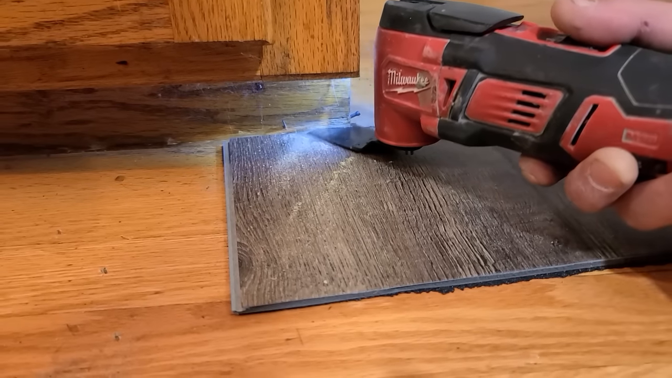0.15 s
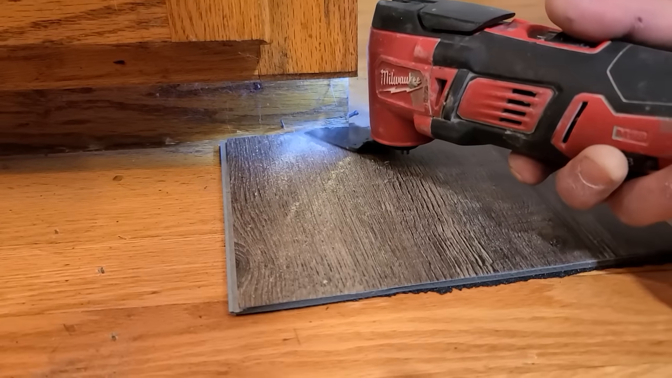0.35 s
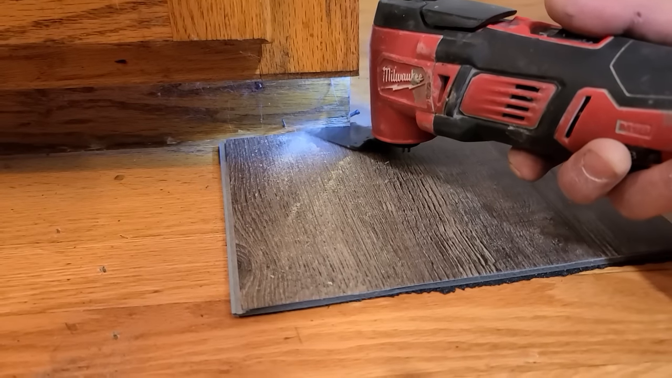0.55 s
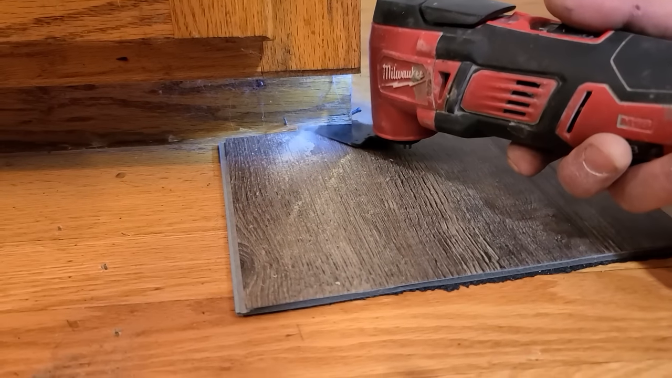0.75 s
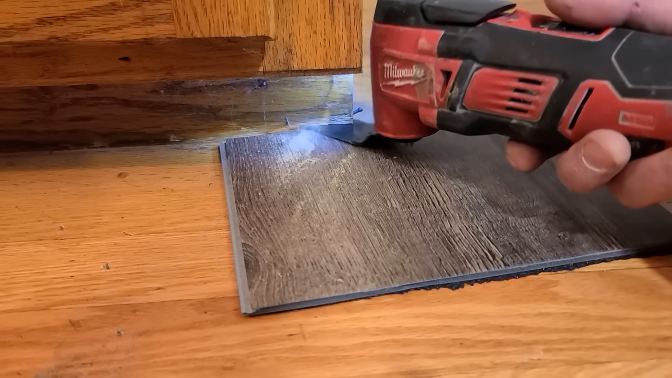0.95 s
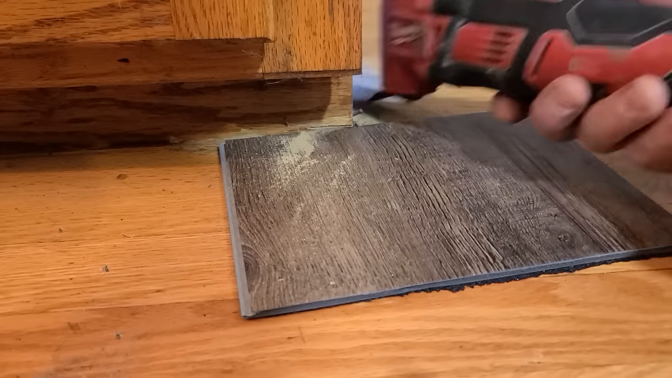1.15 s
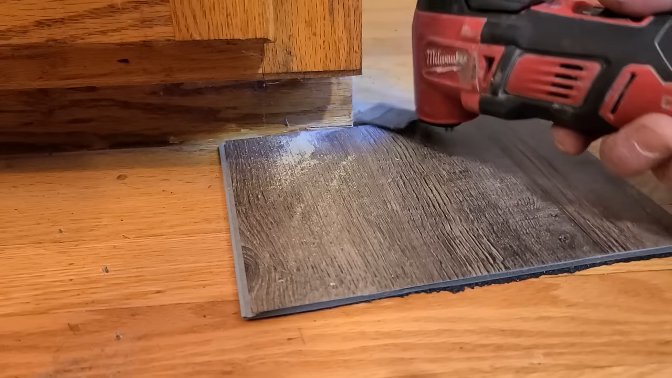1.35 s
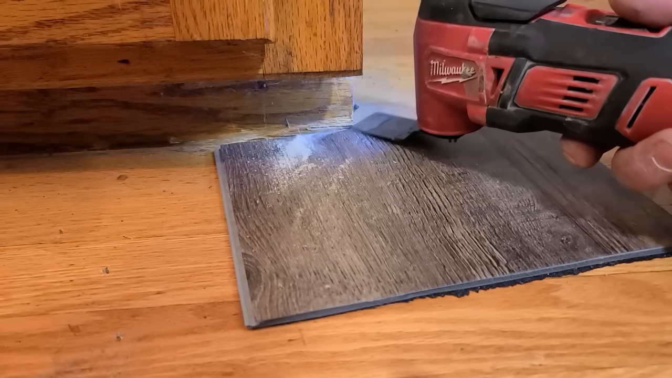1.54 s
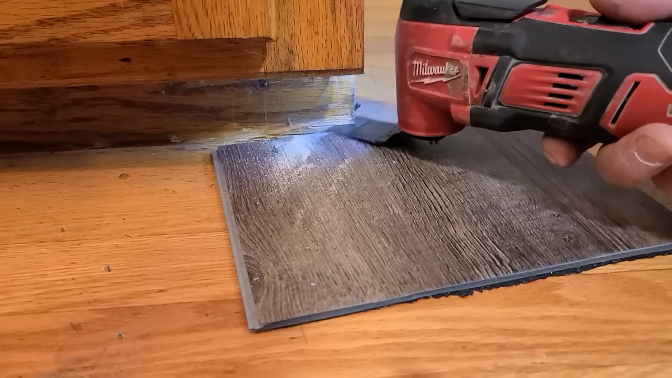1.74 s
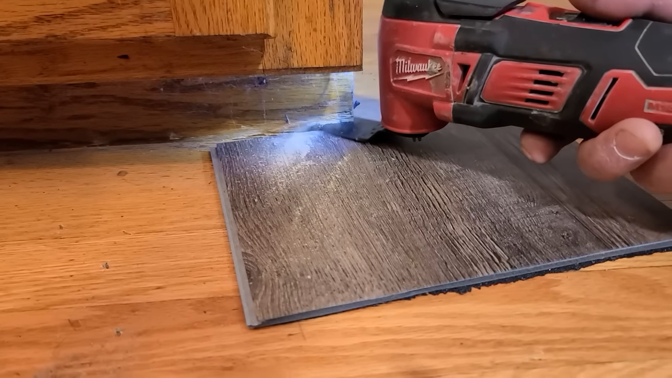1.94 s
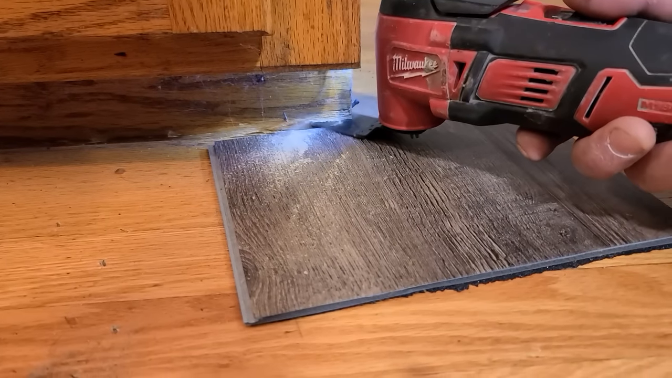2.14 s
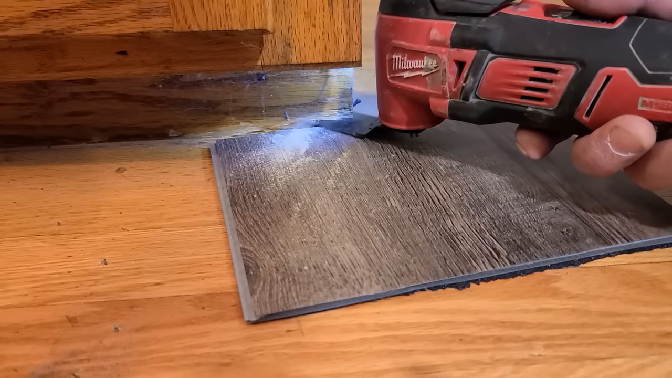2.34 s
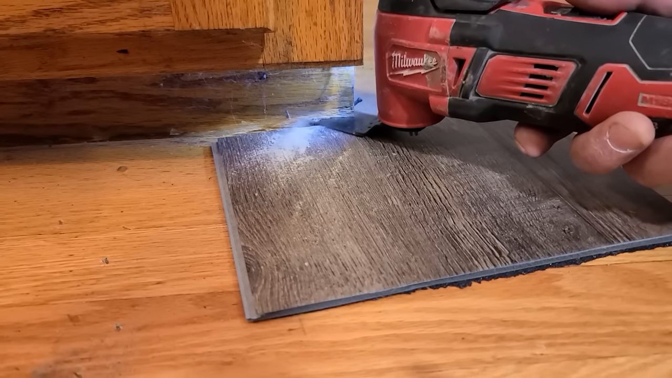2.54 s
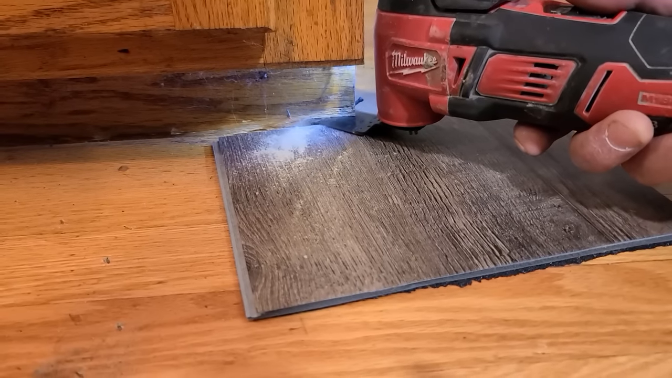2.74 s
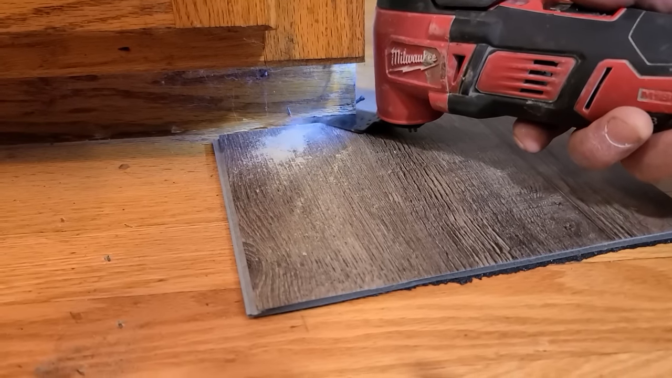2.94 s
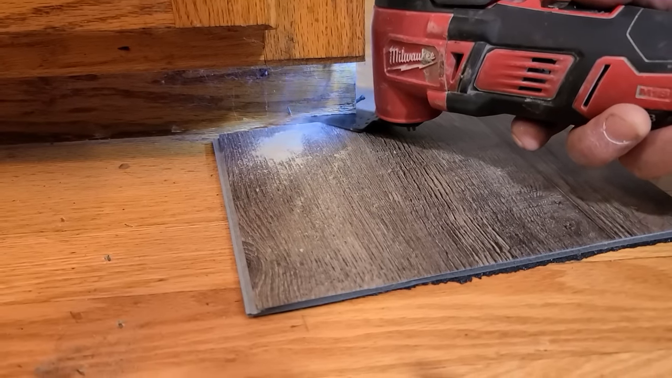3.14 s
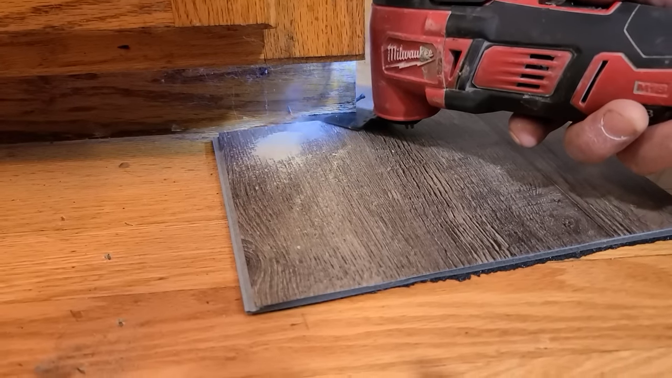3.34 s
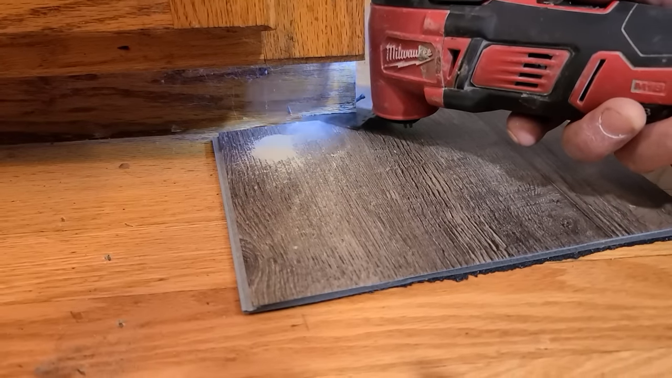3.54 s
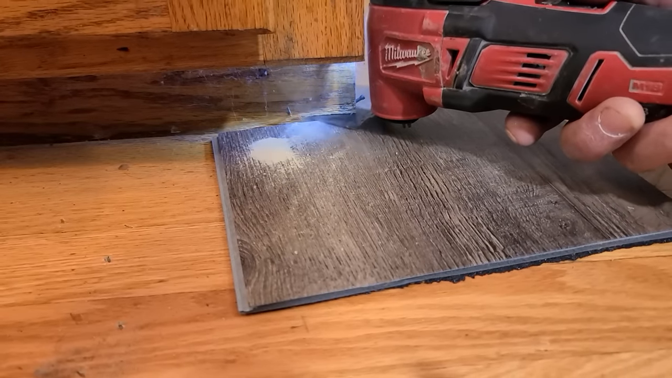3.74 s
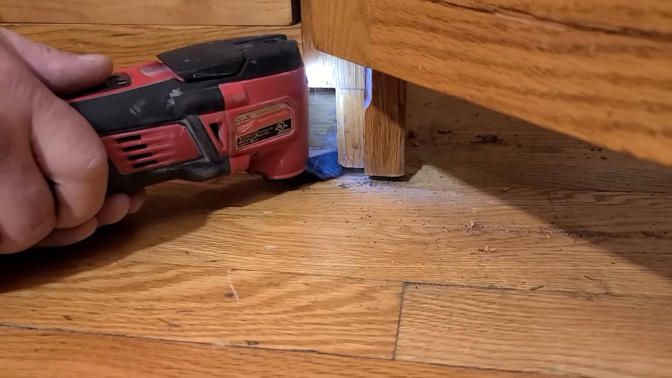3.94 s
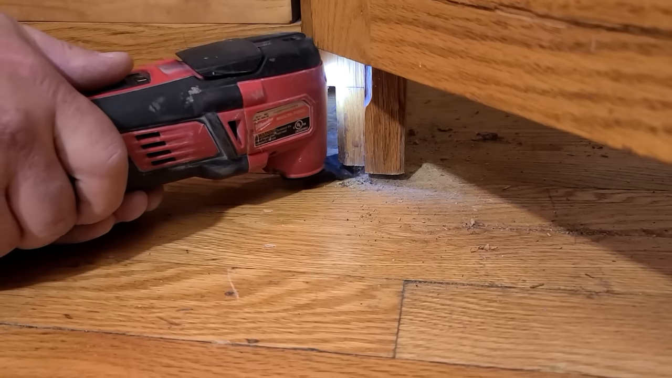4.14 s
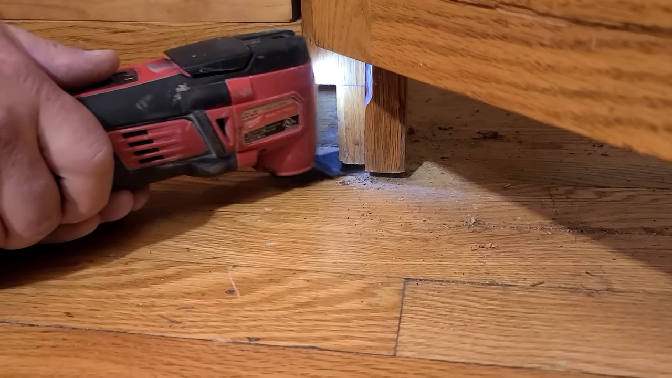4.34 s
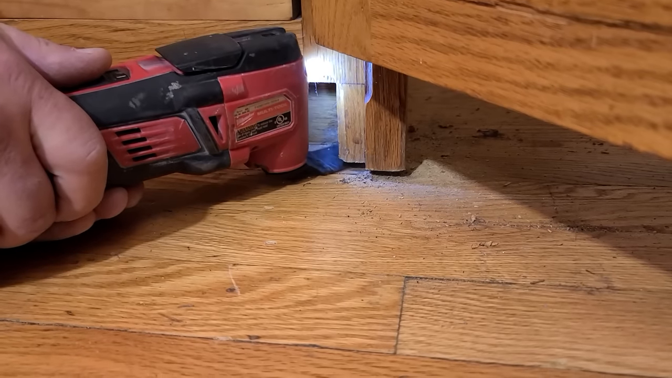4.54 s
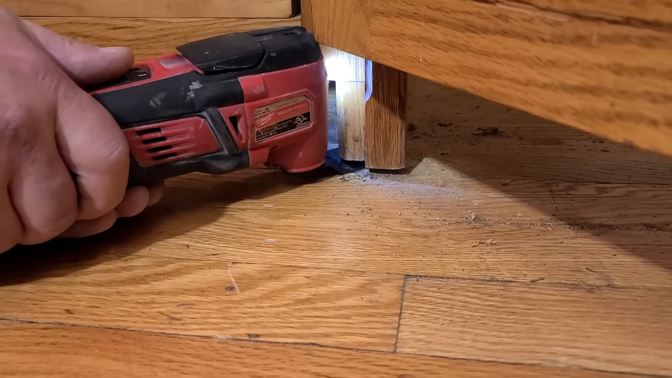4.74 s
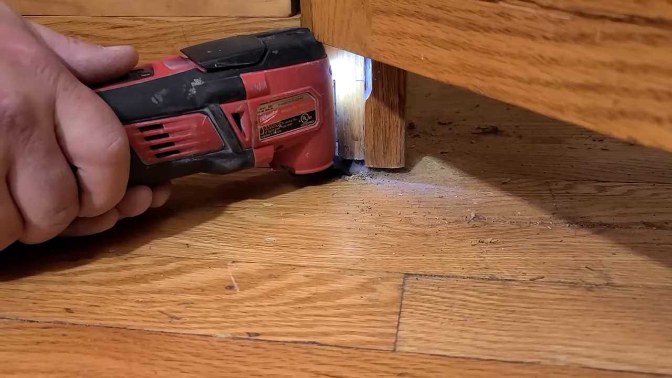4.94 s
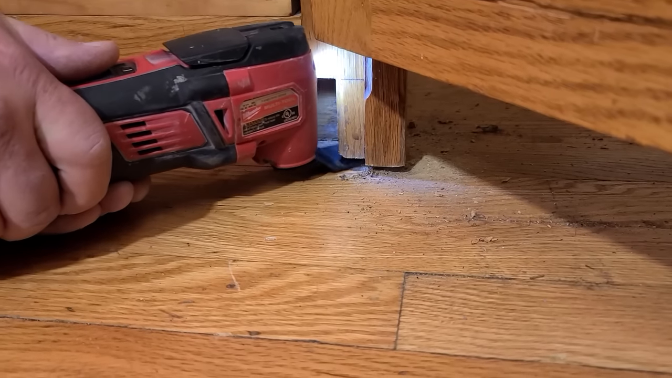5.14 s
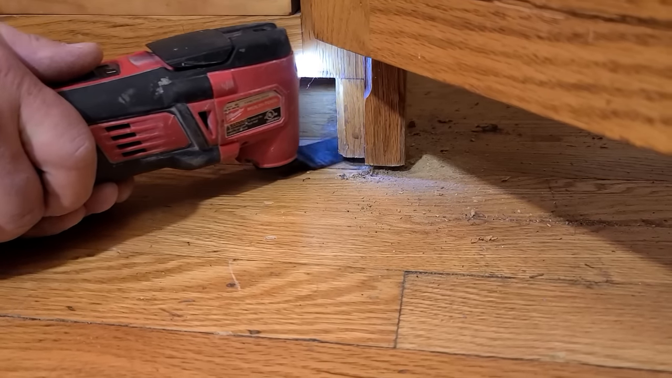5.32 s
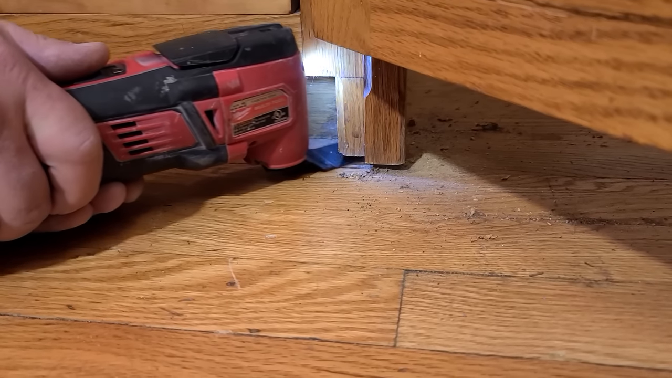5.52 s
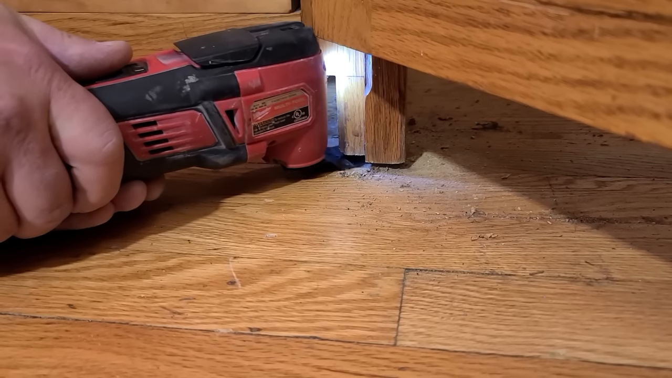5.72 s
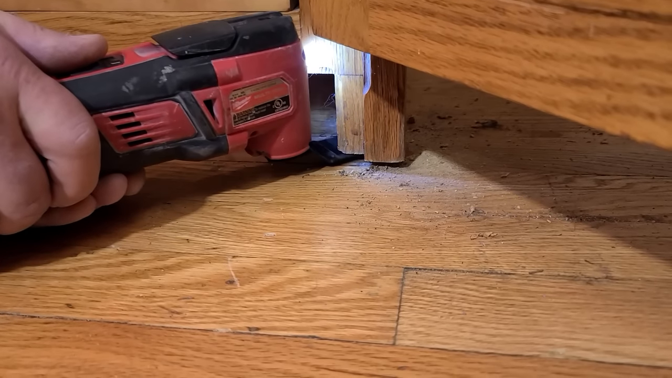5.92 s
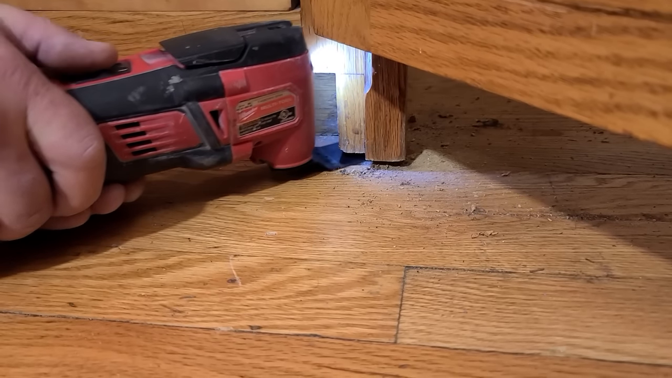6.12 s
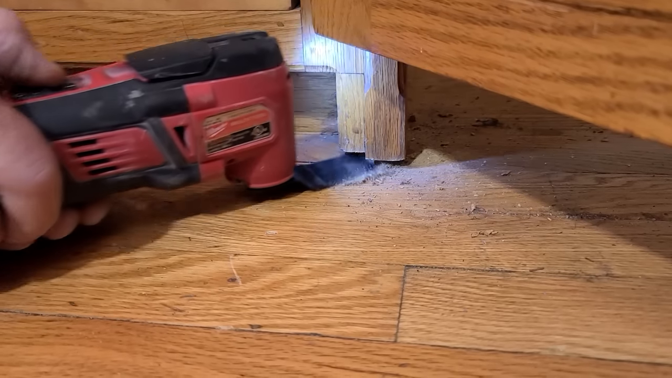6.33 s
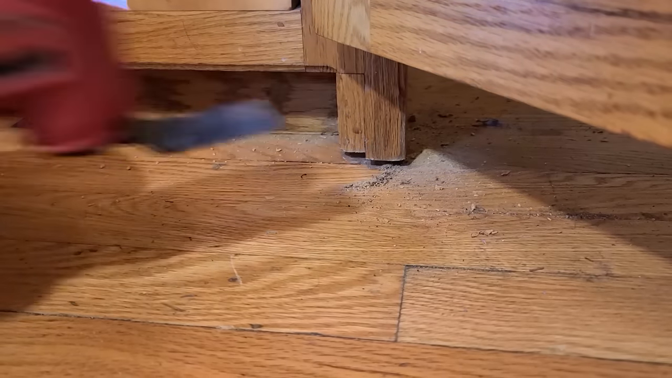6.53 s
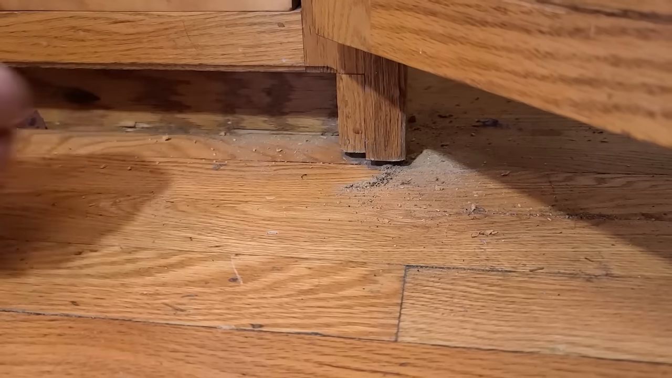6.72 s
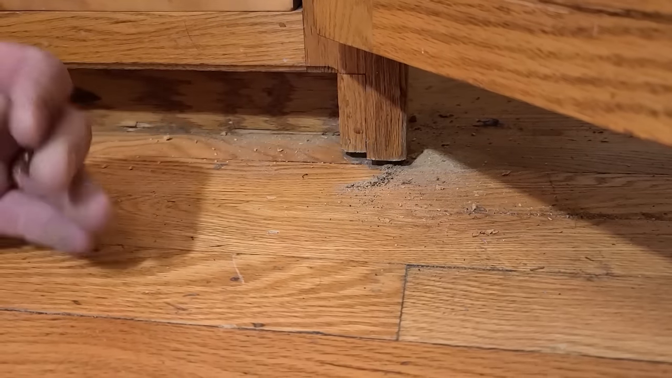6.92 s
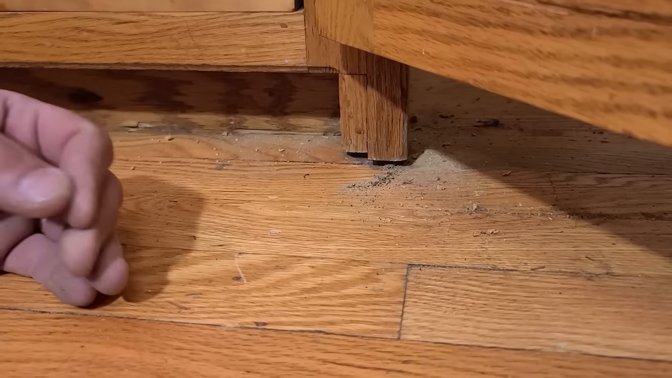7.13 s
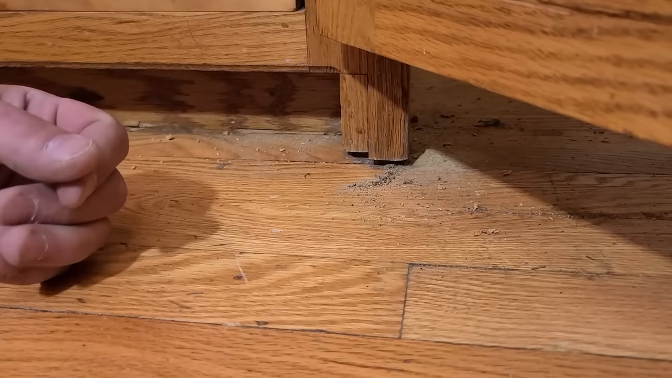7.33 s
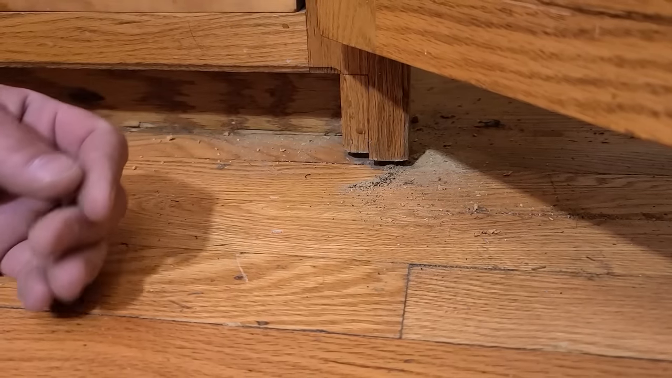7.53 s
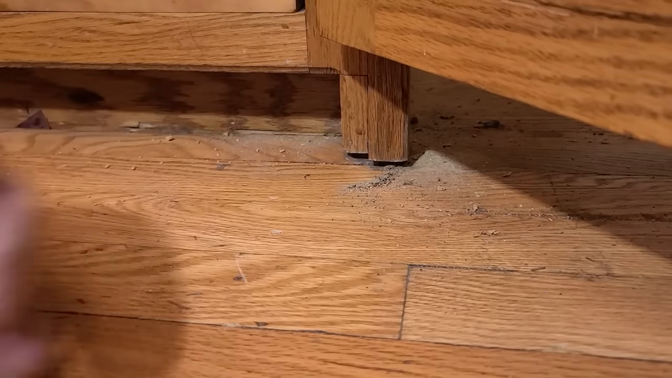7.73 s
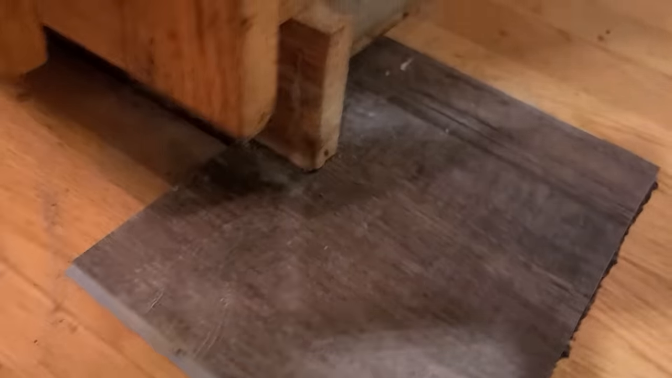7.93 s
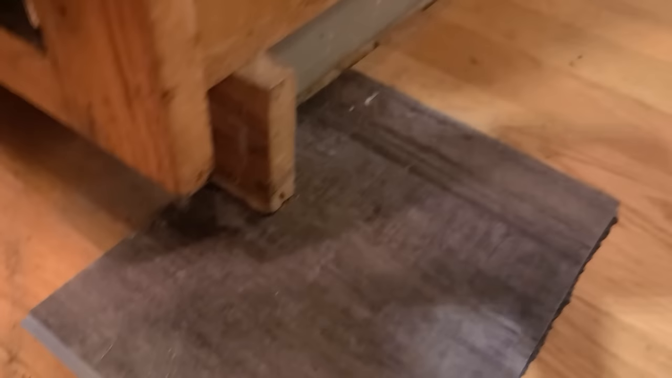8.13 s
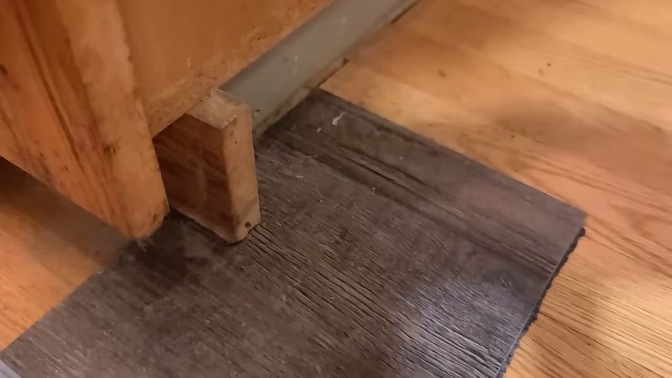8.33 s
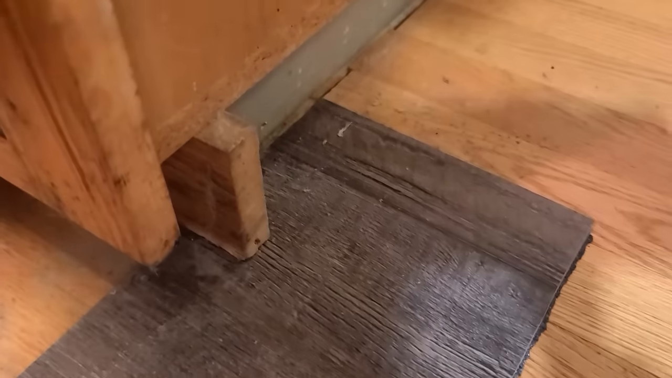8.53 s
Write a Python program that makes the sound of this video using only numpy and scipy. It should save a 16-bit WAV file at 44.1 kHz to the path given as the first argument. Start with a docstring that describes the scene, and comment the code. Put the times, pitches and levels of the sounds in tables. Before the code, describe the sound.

Loud, rasping power-tool buzz makes two close cuts into wood, coasts down in pitch, then a bouncing thud and a short gritty plank slide.

```python
"""A harsh buzz starts near 250 Hz: a cordless oscillating saw bites into cabinet trim near the floor, first
from one side, then from the other. Partials of the swing rate make the buzz; filtered noise makes the blade's
chatter and rasp, and narrow noise on gliding tones its squeal. The saw coasts down and drops on the boards as
decaying modes and noise bursts. Last, a plank slides over the floor as scraping noise. One microphone, its
peaks rounded, feeds both channels."""
import sys
import numpy as np
from scipy import signal
from scipy.fft import rfft, irfft
from scipy.io import wavfile

SR = 44100
rng = np.random.default_rng(int(sys.argv[2]) if len(sys.argv) > 2 else 0)


def file_out(sig):
    """Save sig as 16-bit WAV at sys.argv[1]."""
    # one column per channel
    cols = np.atleast_2d(sig).T
    # limit, then scale
    lim = np.clip(cols, -1, 1)
    pcm = np.round(lim * 32767).astype(np.int16)
    wavfile.write(sys.argv[1], SR, pcm)


N = 382347
TIME = np.arange(N) / SR  # s

LIFT_S = 6.426  # the motor is switched off

# How hard the blade is fed in each cut, before binding and coasting:
# (time [s], relative buzz level [dB], relative chatter level [dB], relative rasp level [dB])
FIRST_FEED = [(0, -21.5, -28.5, -31.5), (.5, -18, -27.5, -22), (.9, -17.5, -26, -19),
              (1.1, -20, -26.5, -27.5), (1.3, -21.5, -25, -25), (2.1, -22.5, -26, -27.5),
              (2.4, -22, -26.5, -24), (3.0, -20, -26.5, -20), (3.87, -17.5, -24, -22.5)]
SECOND_FEED = [(3.87, -21.5, -26.5, -30), (4.35, -17.5, -24, -29), (4.65, -20, -25.5, -29),
               (5.0, -20.5, -25, -31.5), (5.5, -19, -25.5, -30.5), (5.8, -20.5, -26.5, -32.5),
               (6.4, -22.5, -23.5, -29), (7.3, -17, -21.5, -34.5)]
# Spectra of each cut, for the partials of the buzz, the blade on wood and the teeth:
# (frequency [Hz], relative level [dB])
FIRST_TONE = [(170, -18), (480, -18.5), (720, -10), (1000, -10), (2000, -9.5), (3200, -20), (7300, -24),
              (10500, -30), (13000, -56), (15500, -39)]
FIRST_CHATTER = [(40, -10), (100, -14), (160, -25), (260, -13), (560, -10.5), (1090, -0.5), (1600, -0.5),
                 (3000, -7), (5000, -26.5)]
FIRST_RASP = [(1500, -11), (2500, -5), (3800, -3), (7000, 0), (8300, -3.5), (10200, -9.5), (13300, -5),
              (16000, -9.5)]
SECOND_TONE = [(60, -28), (240, -19.5), (480, -13), (715, -5.5), (1400, -7), (2000, -10.5), (3000, -17.5),
               (4300, -26), (9000, -36)]
SECOND_CHATTER = [(40, -43), (100, -43), (230, -6.5), (430, -19), (700, 0), (1000, -1.5), (1250, 2),
                  (2200, -4.5), (5000, -27)]
SECOND_RASP = [(1500, 3), (2500, -1), (3500, 5), (5700, -6), (9600, -11.5), (12800, -14.5), (16000, -15)]
# Swing rate of the first cut, where load drags the motor down: (time [s], swing rate [Hz])
SPEED = [(0, 250.4), (.12, 247.3), (.5, 242.9), (.82, 223.5), (.98, 189.9), (1.1, 191.3), (1.112, 261),
         (1.35, 252.8), (1.59, 246.6), (2.05, 243.2), (2.63, 245.4), (2.8, 231.6), (2.91, 234.4),
         (3.21, 226.6), (3.4, 223.2), (3.8, 219.4), (3.865, 222.6)]
# The blade binds in the kerf: (middle [s], width between 1/e points [s], rise of the chatter [dB])
BINDS = [(.21, 0.11, 4), (0.405, 0.046, 5), (0.878, 0.19, 6), (0.994, 0.16, 10.5), (1.385, 0.055, 3),
         (3.24, 0.11, 2), (3.403, .1, 3.5), (3.998, 0.24, 8), (4.174, .12, 8.5), (4.48, .12, 11.5),
         (4.586, 0.15, 6.5), (4.773, 0.12, 8), (5.167, .06, 0), (5.303, 0.15, 7), (5.402, 0.11, 7.5),
         (5.544, 0.12, 8.5), (5.667, 0.056, 6), (5.97, 0.069, 7), (6.21, 0.052, 5)]
BIND_BUZZ, BIND_RASP = -0.42, 0.43  # dB of buzz and rasp per dB of chatter
HELD_HZ = 238.5  # swing rate the motor holds through the second cut
COAST_S = 0.72  # after switching off, the speed falls by 1/e in this time
COAST_DB = (38, 18, 1.5)  # loss of buzz, chatter and rasp per second of coasting
COAST_END_DB = (34, 60, 52)  # further loss per second cubed, as the swing dies
COAST_STUMBLE = 0.4  # factor: out of the wood the swing runs nearly clean
GROWL_HZ, GROWL_WIDTH_HZ, GROWL_GAIN = 696, 530, 4.3  # the chatter deepens as load drags the motor down


def saw(feed, tone, chatter, rasp):
    """Periodic forcing and friction: swings repeat (buzz), bang unevenly on wood (chatter) and scrape (rasp)."""
    coast = np.maximum(TIME - LIFT_S, 0)
    (first_hz,), _ = curves(SPEED)
    driven_hz = np.where(TIME < SECOND_FEED[0][0], first_hz, HELD_HZ)
    hz = driven_hz * np.exp(-coast / COAST_S)

    feed_db, on = curves(feed)
    bind = np.max([db * np.exp(-(2 * (TIME - middle) / width) ** 2) for middle, width, db in BINDS], axis=0)
    buzz_db, chatter_db, rasp_db = (
        db + share * bind - loss * coast - end_loss * coast ** 3
        for db, share, loss, end_loss in zip(feed_db, (BIND_BUZZ, 1, BIND_RASP), COAST_DB, COAST_END_DB))

    # the more chatter against buzz, the more the swing stumbles
    chatter_share = 1 / (1 + undb(2 * (buzz_db - chatter_db)))
    stumble = np.where(coast > 0, COAST_STUMBLE, 1) * chatter_share
    out, swing = np.zeros((2, N))
    out[on], swing[on] = buzz(hz[on], buzz_db[on], stumble[on], TIME[on], tone)

    # noise swells once per swing
    bangs = rng.standard_normal(N) * np.exp(0.54 * swing) * undb(3 * walk(300))
    out += undb(chatter_db) * unit(colour(clatter(bangs), chatter))
    drag = np.clip(1 - hz / HELD_HZ, 0, 1) * (coast == 0)
    growl = resonate(bangs, [(GROWL_HZ, GROWL_WIDTH_HZ, 0)])
    out += undb(chatter_db) * GROWL_GAIN * drag * growl

    teeth = rng.standard_normal(N) * np.exp(0.23 * swing) * undb(1.0 * walk(44) + 1.1 * walk(350))
    out += undb(rasp_db) * unit(colour(teeth, rasp))
    return out * on, swing


def buzz(hz, level_db, stumble, t, tone):
    """Harmonic series of the swing rate; grip and depth change, so each partial fades and returns alone."""
    phase = np.cumsum(hz) / SR + 0.045 * stumble * walk(45, t)  # in swings
    out = 0
    for k in range(1, 58):
        lift_db = lift(t, k * hz)
        # a lifted partial also holds steadier
        fade_db = 7 * np.abs(walk(6, t)) * undb(-lift_db)
        share_db = 6 + shape_db(tone, k * hz) + lift_db - fade_db
        # a stumbling swing weakens and shakes all but the housing's own hum (k = 1)
        shake = (k > 1) * stumble * walk(40, t)
        sink_db = (k > 1) * stumble * 5
        gain = np.sqrt(2) * undb(level_db + share_db + 6 * shake - sink_db)
        out = out + gain * np.sin(2 * np.pi * (k * phase + 0.22 * shake + rng.random()))
    return out, np.cos(2 * np.pi * phase)


# The trim resonates for a while and lifts the partial near it:
# (start [s], length [s], centre frequency [Hz], lift [dB])
SWELLS = [(0, .2, 990, 6.5), (0.126, 0.68, 700, 4.5), (0.096, 0.14, 1230, 5.5), (0.47, 0.22, 1895, 9),
          (0.688, 0.38, 1130, 7.5), (0.708, 0.42, 215, 8.5), (0.146, 0.37, 1470, 5.5), (.5, 0.19, 2097, 9),
          (0.853, .2, 1040, 7.5), (0.596, 0.24, 460, 3), (1.13, 0.13, 1805, 4), (1.177, 0.12, 1290, 3.5),
          (1.351, 0.19, 750, 3.5), (1.324, .2, 1000, 4.5), (1.49, 0.73, 1225, 5.5), (1.8, .4, 1967, 3.5),
          (2.216, 1.11, 730, 8.5), (2.26, 0.38, 1470, 6.5), (2.24, .85, 1904, 7.5), (2.3, 0.42, 245, 6.5),
          (3.002, 0.76, 1134, 4.5), (3.051, 0.91, 222, 4), (3.302, 0.32, 890, 4), (3.35, 0.7, 1377, 5.5),
          (4.1, 2.35, 1180, 4.5), (4.048, .12, 1430, 6.5), (4.63, .15, 715, 1), (4.246, 0.27, 973, 3),
          (4.951, .33, 950, 3.5), (4.95, .15, 239, 4), (5.138, 0.28, 480, 5), (5.604, 0.6, 483, 6.5),
          (5.648, 0.15, 715, 5), (5.655, 0.4, 943, 2.5), (6.253, .42, 653, 7.5), (6.237, .3, 229, 3.5),
          (6.477, .1, 1870, 7), (6.65, 0.13, 1260, 8), (1.2, .12, 3600, 7), (1.2, .15, 5370, 8.5)]
SWELL_WIDTH_HZ, SWELL_EDGE_S = 63, 0.046  # half-width at 1/e of the lift, rise time


def lift(t, hz):
    """Resonance: gain in dB that a partial takes from passing modes near its frequency."""
    t0, f = t[::64], hz[::64]  # slow enough to compute every 64th sample
    db = sum(rise_db * hold(start, length, SWELL_EDGE_S, t0)
             * np.exp(-((f - centre) / SWELL_WIDTH_HZ) ** 4)  # flat-topped
             for start, length, centre, rise_db in SWELLS)
    return np.interp(t, t0, db)


def clatter(bangs):
    """Modal response: the loose trim answers in narrow resonances, each flaring on its own."""
    out = 0.5 * bangs
    for hz in 420 * 1.13 ** np.arange(16):
        mode = signal.lfilter(*signal.iirpeak(hz, 10, SR), bangs)  # Q of 10
        out = out + undb(5 * walk(18)) * mode
    return out


# The blade rubs metal and rings:
# (start [s], length [s], low squeal frequency [Hz], relative low, middle and high mode levels [dB, dB, dB])
SQUEALS = [(3.902, 0.24, 9300, -37.5, -35, -42), (4.208, 0.27, 9200, -25, -31, -31),
           (4.62, 0.19, 9200, -31.5, -37, -40), (4.793, 0.15, 9300, -31.5, -44, -40),
           (5.148, 0.18, 9170, -34.5, -46, -35), (5.317, 0.0696, 9140, -28, -45, -19.5),
           (5.449, 0.19, 9380, -34.5, -34.5, -40), (5.699, 0.27, 9230, -39, -51, -48),
           (6.15, 0.18, 9300, -38, -52, -40)]
# Modes of each group: (ratio to the low squeal frequency, noise bandwidth [Hz], relative level [dB])
LOW_MODES = [(1, 280, 1.5), (.83, 370, -6), (1.09, 450, -1.5)]
MIDDLE_MODES = [(1.17, 400, -6), (1.315, 550, 6)]
HIGH_MODES = [(1.505, 300, 2), (1.69, 300, 0)]
SQUEAL_EDGE_S, SQUEAL_T60_S = 0.025, 0.38  # rise, dying away
SQUEAL_REST_DB = (-51, -49.5, -57)  # faint ring under the squeals: relative low, middle, high


def squeal(swing):
    """Friction-driven modes: uneven scratches ring the steel blade; its modes slide together as it bends."""
    start, length, pitch, *levels = np.transpose(SQUEALS)
    hz = np.interp(TIME, start + length / 2, pitch)
    gates = np.array([hold(a, np.inf, SQUEAL_EDGE_S) * undb(-60 * np.maximum(TIME - a - b, 0) / SQUEAL_T60_S)
                      for a, b in zip(start, length)])
    running = hold(start[0], LIFT_S - start[0], SQUEAL_EDGE_S)
    out = 0
    for db, rest_db, modes in zip(levels, SQUEAL_REST_DB, (LOW_MODES, MIDDLE_MODES, HIGH_MODES)):
        envelope = undb(db) @ gates + undb(rest_db) * running
        for ratio, width_hz, mode_db in modes:
            # each mode flares alone
            scratch = rng.standard_normal(N) * np.exp(0.6 * swing) * undb(1.5 * walk(60) + 4.5 * walk(10))
            band = signal.lfilter([1], [1, -np.exp(-np.pi * width_hz / SR)], scratch)
            carrier = np.sin(2 * np.pi * np.cumsum(ratio * hz) / SR)
            out = out + undb(mode_db) * envelope * unit(band) * carrier
    return out


# The saw lands and bounces: (time [s], relative thud, crack and rattle levels [dB, dB, dB])
DROPS = [(7.187, -24, -57, -56), (7.245, -40, -70, -67), (7.29, -36, -70, -60), (7.399, -24, -27.5, -24.5),
         (7.412, -19, -21.5, -29), (7.425, -10.5, -49, -13.5), (7.45, -33, -45, -27),
         (7.503, -11.5, -29.5, -23.5), (7.558, -15, -36, -30), (7.596, -17, -42, -36)]
# Modes of floorboards, shell and blade: (frequency [Hz], relative level [dB], decay time T60 [s])
BOARDS = [(147.3, 8.5, 0.24), (168, 14.5, 0.16), (193, 3, 0.087), (257, -2.5, 0.26), (290, -1, 0.089),
          (431, -17, 0.098)]
SAW_BODY = [(2570, 8.5, 0.022), (3000, 6, 0.016), (3550, 4.5, 0.017), (6140, -5, 0.029)]
BLADE = [(6100, -56, 1.3), (9776, -50, .7)]
# Spectrum of the loose parts: (frequency [Hz], relative level [dB])
RATTLE = [(200, 6), (320, 5), (640, -2), (1500, -13.5), (4000, -21.5), (9000, -41.5), (16000, -41)]
HARD_LANDING = 3  # row of DROPS, counted from 0, that rings the blade


def drop():
    """Impact excitation: boards thud, the saw's shell cracks, loose parts rattle on, the blade rings."""
    times, thud_db, crack_db, rattle_db = np.transpose(DROPS)
    push = signal.windows.hann(120)  # the padded body lands softly
    thud = strike(times, thud_db - 16.0, np.convolve(ring(BOARDS), push / push.sum()))
    no_bass = signal.butter(3, 110, "high", fs=SR, output="sos")  # the thud carries no deep bass
    thud = signal.sosfilt(no_bass, thud)
    crack = strike(times, crack_db, ring(SAW_BODY) + 0.48 * burst(0.024))
    rattle = colour(strike(times, rattle_db + 14.0, burst(0.3)), RATTLE)
    blade = strike(times[[HARD_LANDING]], 0, ring(BLADE))
    return thud + crack + rattle + blade


# The plank's slide: (time [s], scrape level [dB], rumble level [dB])
SLIDE = [(7.858, -37, -51), (7.956, -36, -58), (8.356, -39, -57), (8.67, -38.5, -43)]
# Spectrum of the scrape: (frequency [Hz], relative level per Hz [dB])
PLANK = [(150, -10.5), (545, -1), (1060, -0.5), (1600, -9), (2700, -9), (4160, -10.5), (7000, -20),
         (11000, -23.5), (15600, -21), (16500, -24)]
# Something small and metallic pings: (time [s], relative level [dB])
PINGS = [(8.0731, -29.5), (8.3739, -34)]
# Its modes: (frequency [Hz], relative level [dB], decay time T60 [s])
PING_MODES = [(9590, 0.5, 0.1), (9400, -12, .06), (12900, -20, .05), (8050, -8, .03)]
# Grains snap under the plank: (time [s], relative level [dB])
GRIT = [(7.8384, -48), (7.8935, -32), (8.0097, -32), (8.1514, -29), (8.4194, -36), (8.4382, -27),
        (8.5984, -30)]


def plank():
    """Sliding friction: a plank scrapes and rumbles over gritty boards, as unevenly modulated noise."""
    (scrape_db, rumble_db), gate = curves(SLIDE)
    rub = rng.standard_normal(N) * undb(1.2 * walk(50) + 0.46 * walk(380))
    scrape = undb(scrape_db) * unit(colour(rub, PLANK))
    rumble = undb(rumble_db) * unit(resonate(rng.standard_normal(N), [(90, 180, 0)]))
    snap = np.diff(burst(0.008), 2) / 3  # differencing brightens the snap
    pings = strike(*np.transpose(PINGS), ring(PING_MODES))
    return gate * (scrape + rumble) + pings + strike(*np.transpose(GRIT), snap)


# Level of the hush, which lasts until just before the slide: (time [s], level [dB])
ROOM_LEVEL = [(0, -53), (7.38, -53), (7.6, -48), (7.8, -59), (7.855, -52)]
# Spectrum of the hush: (frequency [Hz], relative level per Hz [dB])
ROOM = [(60, -6), (150, -13), (250, -3), (393, -5.5), (1260, -8), (1700, -18), (3580, -15), (7840, -33),
        (9170, -29), (16000, -36)]
# A faint high whine outlasts the motor: (time [s], relative level [dB])
WHINE = [(7.0, -71), (7.1, -55), (7.35, -62.5), (7.45, -81)]


def room():
    """Stationary noise, spectrally shaped: a faint hush, and a whine of two narrow bands."""
    (hush_db,), quiet = curves(ROOM_LEVEL)
    (whine_db,), on = curves(WHINE)
    whine = resonate(rng.standard_normal(N), [(9300, 450, 1.5), (6500, 600, -6)])
    hush = unit(colour(rng.standard_normal(N), ROOM))
    return quiet * undb(hush_db) * hush + on * undb(whine_db) * whine


def undb(db):
    """Decibel law: level in dB to amplitude."""
    return 10 ** (np.asarray(db) / 20)


def unit(x):
    """Energy normalisation: scales to an RMS of one."""
    return x / np.sqrt(np.mean(x ** 2))


def curves(table):
    """Linear interpolation: columns as sample curves, and a gate that is open while the table lasts."""
    s, *columns = np.transpose(table)
    gate = (TIME >= s[0]) & (TIME <= s[-1])
    return [np.interp(TIME, s, c) for c in columns], gate


def hold(start, length, edge, t=TIME):
    """Trapezoidal envelope: rises over the edge time, holds, and falls again."""
    return np.clip(np.minimum(t - start, start + length - t) / edge + 0.5, 0, 1)


def walk(rate, t=TIME):
    """Random modulation: rate (at most 400) levels a second, joined by straight lines."""
    steps = rng.standard_normal(int(N / SR * 400) + 2)
    return np.interp(t * rate, np.arange(len(steps)), steps)


def shape_db(points, hz):
    """Spectral envelope: levels interpolated over log frequency, much weaker outside the points."""
    f, db = np.transpose(points)
    return np.interp(np.log(hz), np.log(f), db, db[0] - 31.5, db[-1] - 32.5)


def colour(x, points):
    """Minimum-phase filtering: a causal response from the folded cepstrum of the log gain."""
    hz = np.maximum(np.arange(2049) * SR / 4096, 1)
    cepstrum = irfft(np.log(undb(shape_db(points, hz))))
    cepstrum[1:2048] *= 2
    cepstrum[2049:] = 0
    response = irfft(np.exp(rfft(cepstrum)))
    return signal.fftconvolve(x, response)[:N]


def resonate(x, peaks):
    """Resonance: sums band-passed copies of x; peaks are (frequency [Hz], width [Hz], level [dB])."""
    return sum(undb(db) * unit(signal.lfilter(*signal.iirpeak(hz, hz / width, SR), x))
               for hz, width, db in peaks)


def ring(modes):
    """Modal superposition: one second of exponentially decaying sines."""
    t = TIME[:SR]
    return sum(undb(db) * np.sin(2 * np.pi * hz * t) * np.exp(-np.log(1000) * t / t60)
               for hz, db, t60 in modes)


def burst(t60):
    """Exponential decay: one second of noise that falls 60 dB in t60 seconds."""
    return rng.standard_normal(SR) * np.exp(-np.log(1000) * TIME[:SR] / t60)


def strike(times, db, sound):
    """Impulse response: convolution starts the sound at each time."""
    blows = np.zeros(N)
    blows[(np.asarray(times) * SR).astype(int)] = undb(db)
    return signal.fftconvolve(blows, sound)[:N]


def scene():
    """Superposition: the sources add linearly, alike in both channels."""
    first, _ = saw(FIRST_FEED, FIRST_TONE, FIRST_CHATTER, FIRST_RASP)
    second, swing = saw(SECOND_FEED, SECOND_TONE, SECOND_CHATTER, SECOND_RASP)
    mono = first + second + squeal(swing) + drop() + room() + plank()
    return np.array([mono, mono])


def record(dry):
    """Saturation and band limiting: the microphone rounds peaks, loses deep bass and cuts the top."""
    ceiling = 0.36  # amplitude the peaks approach
    soft = ceiling * np.tanh(dry / ceiling)
    thin = signal.sosfilt(signal.butter(4, 55, "high", fs=SR, output="sos"), soft)
    return signal.sosfilt(signal.ellip(10, 0.2, 80, 15750, fs=SR, output="sos"), thin)


dry = scene()
out = record(dry)
file_out(out)
```